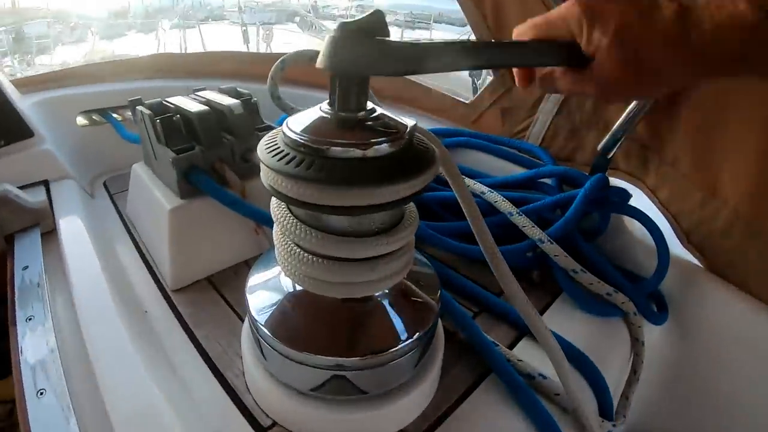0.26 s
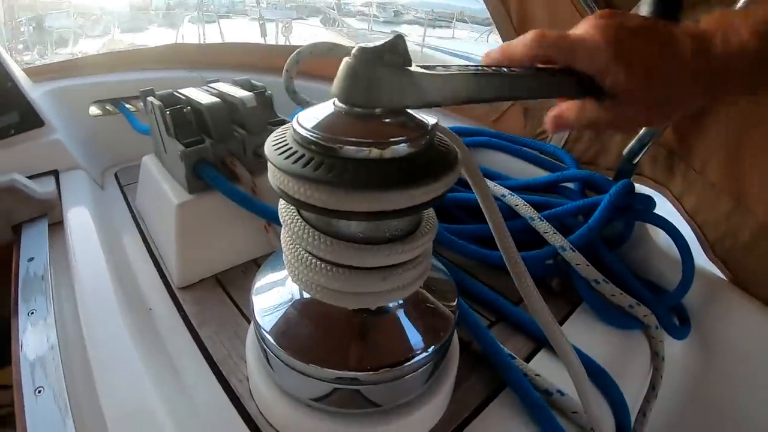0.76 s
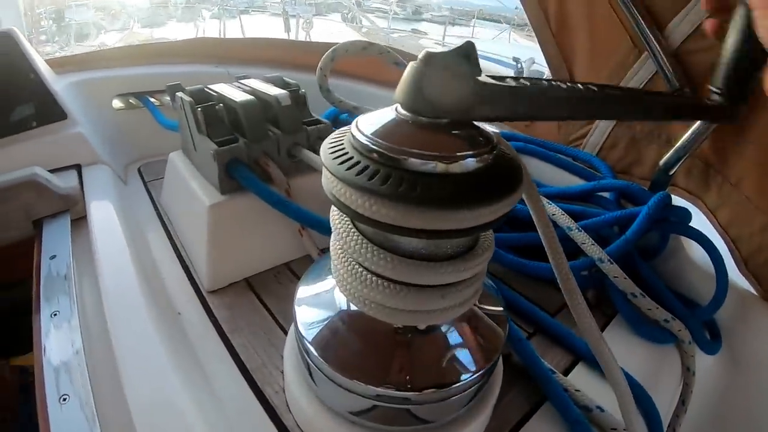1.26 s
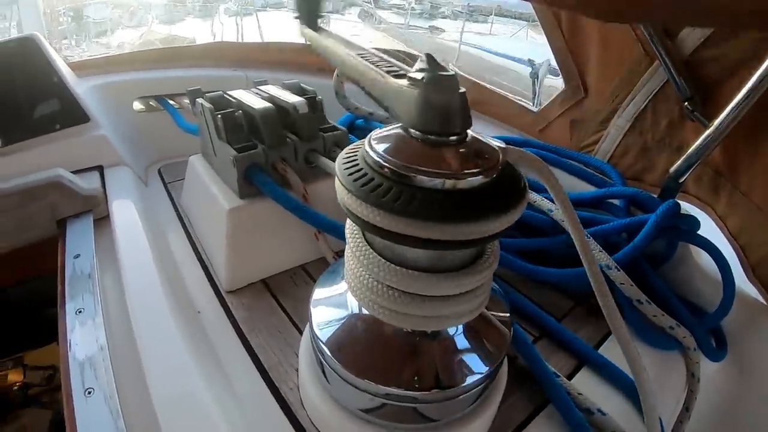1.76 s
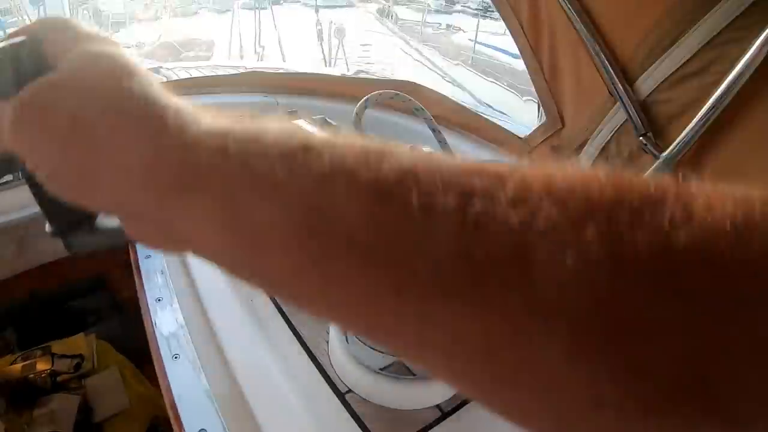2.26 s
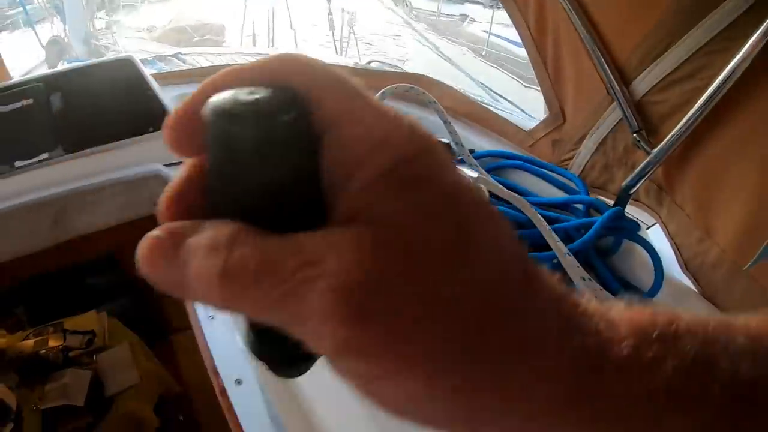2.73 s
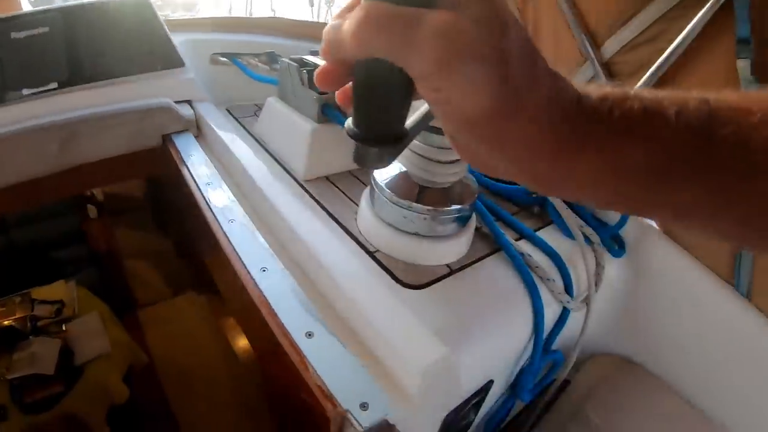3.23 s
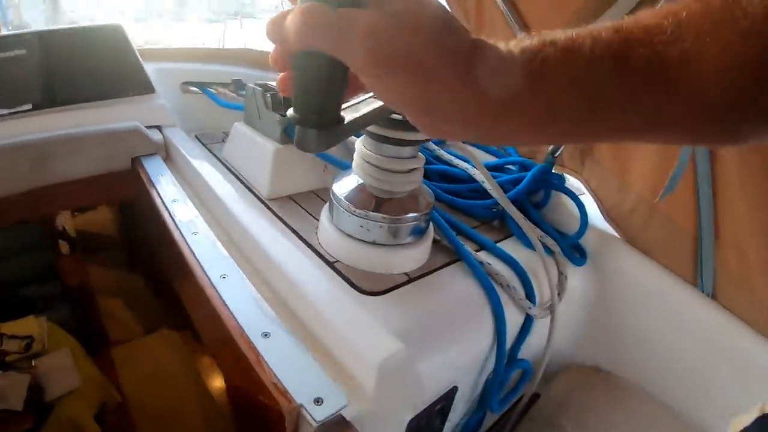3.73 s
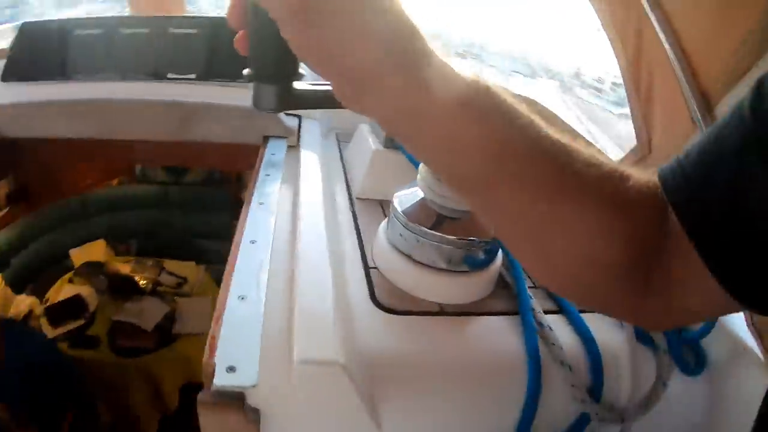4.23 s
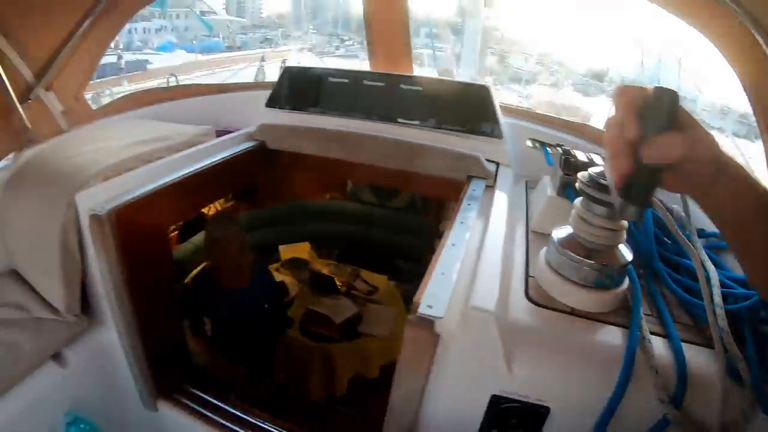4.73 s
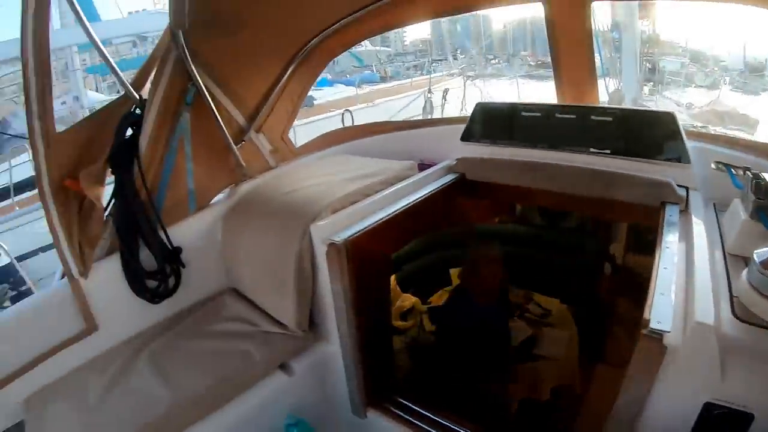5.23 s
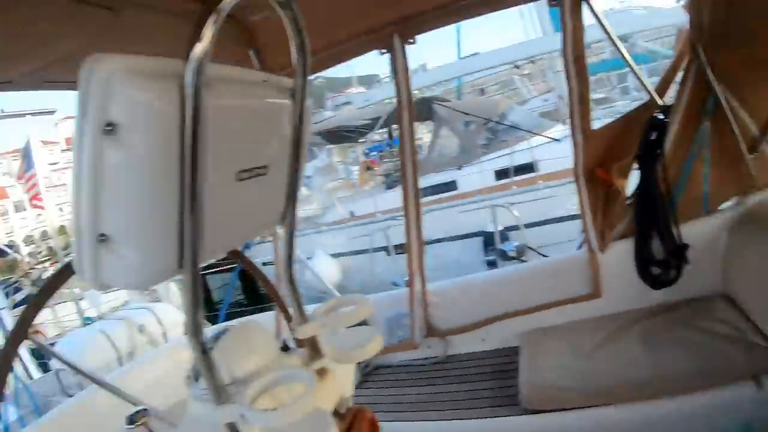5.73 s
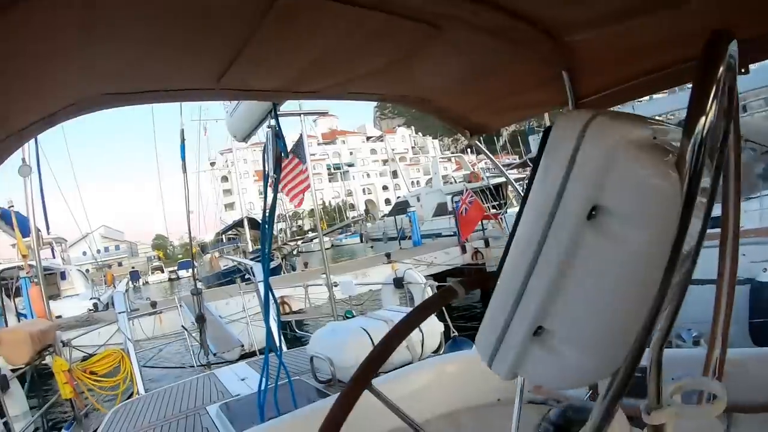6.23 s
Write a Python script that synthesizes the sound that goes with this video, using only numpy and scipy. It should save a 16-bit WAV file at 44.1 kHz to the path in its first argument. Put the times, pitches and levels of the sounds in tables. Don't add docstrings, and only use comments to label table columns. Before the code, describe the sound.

Two solid metallic knocks thump a boat deck, a spring pings, then a winch ratchets in two runs of crisp clacks amid cloth rustle and light wind.

```python
import sys
import numpy as np
from scipy import signal
from scipy.fft import rfft, irfft, next_fast_len
from scipy.io import wavfile
from scipy.ndimage import map_coordinates

SR = 44100
rng = np.random.default_rng(int(sys.argv[2]) if len(sys.argv) > 2 else 0)


def to_wav(sig):
    pcm = np.clip(np.atleast_2d(sig), -1, 1) * 32767
    pcm = np.round(pcm).astype(np.int16)
    wavfile.write(sys.argv[1], SR, pcm.T)


def boost_factor(decibels):
    exponent = np.asarray(decibels, float) / 20
    return 10 ** exponent


N = 285703

# start [s], peak [dB], bright part re peak [dB], ring [Hz].
TOUCHES = [(0.0004, -23.5, -12, 2480), (0.0233, -32.5, -14, 2230), (0.0845, -23.5, -16, 2310),
           (0.1172, -8.5, -24, 2330), (0.1361, -26.5, -19, 2280), (0.2308, -31.5, -17, 2070),
           (0.2842, -56, -15, 1510), (0.3171, -47.5, -22.5, 1210), (0.453, -36.5, -8.5, 2400),
           (0.4725, 2.5, -11.5, 2490), (0.6357, -43.5, -36.5, 2045), (0.7104, -37, -20.5, 1350),
           (0.716, -34, -22.5, 3540), (0.7589, -39.5, -25, 4520), (0.804, -40.5, -25, 1240),
           (0.86, -51, -3, 1560), (0.9059, -26, -4.5, 1790), (0.9248, -23, -2.5, 4440),
           (1.249, -36, -20, 4670), (2.567, -43, -20, 1200), (2.7324, -44, -25, 1660),
           (3.5418, -51, -19, 1746), (3.882, -53, -20, 1240), (4.142, -43, -18, 1260),
           (4.327, -44.5, -6, 2100), (4.434, -47, -30, 1200)]
# frequency [Hz], density [dB per Hz].
KNOCK_SPECTRUM = [(700, -24.5), (1300, -12), (2000, -4.5), (2450, 0.5), (2900, -7.5), (3500, -2.5),
                  (4500, -5), (5500, -30.5)]
# frequency [Hz], density [dB per Hz].
CRACK_SPECTRUM = [(3500, -20), (4500, -3), (5400, 2), (8000, -3), (12000, -15), (16500, -21.5)]
# frequency [Hz], density [dB per Hz].
THUD_SPECTRUM = [(80, -25), (140, -0.5), (190, 5), (300, -13.5), (600, -12), (1000, -18), (1600, -32)]
# frequency [Hz], level [dB], T60 [s].
DECK_MODES = [(195, 2.5, 0.085), (151, -9, .13), (302, -10.5, 0.15)]
# start [s], level [dB].
SEATED = [
    (0.1178, -7),
    (0.4735, -1.3),
]
# frequency [Hz], level [dB], T60 [s].
SOCKET_MODES = [(2442, 1.5, .03), (2180, -10.5, .06), (2550, -14, 0.1), (3540, -8, 0.03), (3850, -21, .08),
                (5330, -22, 0.072), (7780, -27, 0.03)]
# start [s], frequency [Hz], level [dB], T60 [s].
LATCH_RINGS = [
    (0.907, 6560, -37, 0.06),
    (0.928, 4450, -35, 0.085),
    (0.926, 11000, -35, 0.07),
    (0.927, 11350, -37, 0.11),
    (0.926, 14800, -41, .06),
    (.761, 4520, -49, .08),
]
# start [s], level [dB], T60 [s].
BUMPS = [
    (1.281, -28.5, 0.08),
    (0.905, -34, 0.035),
    (0.926, -37, .05),
    (2.74, -48, 0.057),
    (.745, -45, .03),
    (3.8, -43, .07),
    (.805, -46, .03),
]
# frequency [Hz], density [dB per Hz].
BUMP_SPECTRUM = [(120, -8.5), (250, -4.5), (550, 0.5), (1000, -1), (1500, -7), (2200, -11.5), (4000, -24.5),
                 (8000, -46)]

# time [s], level [dB].
STIR = [(0, -46.5), (.14, -48), (.2, -56.5), (.52, -61), (.9, -60.5), (1.24, -56.5), (1.6, -53.5),
        (2.01, -54), (2.42, -57), (2.65, -53), (3.03, -59), (3.34, -66), (3.7, -58), (3.81, -50.5),
        (4.28, -53), (4.56, -61), (5.14, -55.5), (6.48, -57.5)]
# frequency [Hz], density [dB per Hz].
RUSTLE_SPECTRUM = [(150, -18), (300, 5), (700, -1), (1500, -6.5), (3000, -13.5), (4500, -29)]
# frequency [Hz], density [dB per Hz].
SWISH_SPECTRUM = [(1800, -26), (3500, 5), (6500, -1), (9000, -8), (13000, -9), (16200, -10.5)]
# centre [Hz], width [Hz], level [dB].
HUM_BANDS = [(50, 14, -46), (79.6, 22, -49.5), (113.2, 24, -51), (177, 40, -63), (293.2, 18, -62)]
# time [s], level [dB].
DRONE = [
    (0.0, -45.5),
    (1.95, -46.5),
    (3.59, -51),
    (5.4, -47),
    (6.48, -50.5),
]
# frequency [Hz], density [dB per Hz].
FLOOR_SPECTRUM = [(40, -7), (200, -6), (400, -19), (800, -25), (2000, -30), (5000, -34), (10000, -42.5),
                  (15500, -44), (16300, -53.5)]
# frequency [Hz], density [dB per Hz].
WIND_SPECTRUM = [(5, -11.5), (12, -2), (35, -8), (55, -17.5), (120, -31.5), (300, -48)]
# centre [s], rise [dB], width [s].
GUSTS = [
    (0.77, 8.5, .09),
    (1.8, 3.5, .15),
    (2.45, 4.5, .15),
    (2.9, 5, .12),
    (3.3, 5, .12),
    (3.65, 7, .15),
    (4.35, 4.5, 0.21),
    (5.5, 8.5, 0.16),
    (6.05, 5, .3),
]

# start [s], length [s], centre [Hz], width [Hz], level [dB].
RUBS = [(0.056, 0.046, 2330, 250, -34), (0.427, 0.03, 2450, 200, -57), (0.973, .17, 1490, 300, -64),
        (1.14, 0.14, 1480, 200, -59), (1.04, 0.25, 5400, 1200, -68), (1.193, 0.09, 2850, 300, -61),
        (1.33, 0.14, 3010, 200, -61), (1.327, .1, 2400, 200, -63), (1.482, .1, 1270, 120, -57.5),
        (3.38, 0.16, 806, 50, -67), (3.863, 0.058, 990, 500, -52), (4.05, 0.27, 2400, 1200, -57),
        (1.19, .08, 280, 80, -44), (1.26, .09, 200, 50, -43), (1.27, .06, 520, 200, -50),
        (4.82, .1, 2350, 700, -60.5)]

# start [s], clack [dB], low and high drum ring re clack [dB].
FIRST_TURN = [(1.373, -30.0, -18.5, -25.5), (1.472, -26, -5.5, -17), (1.569, -27, -16.0, -34.5),
              (1.646, -24.5, -8.5, -14.5), (1.715, -22, -21.5, -30), (1.778, -25, -29.0, -38.5),
              (1.847, -25.0, -25, -27.0), (1.922, -24.5, -18.5, -28), (1.995, -27.5, -26.0, -33.0),
              (2.072, -23, -19.0, -34.0), (2.162, -22.0, -18.5, -31), (2.3, -27.5, -2.5, -17.5),
              (2.436, -24.5, -18, -17), (2.592, -31.5, -15.0, -25)]
# start [s], clack [dB], low and high drum ring re clack [dB].
SECOND_TURN = [(4.357, -32, -15.5, -20), (4.557, -29.0, -26, -31.0), (4.754, -29.5, -18.5, -25.0),
               (4.936, -30, -20.5, -35.5), (5.062, -30, -42.5, -41.0), (5.134, -29.5, -22, -24),
               (5.194, -30, -19.5, -45.0), (5.268, -32.5, -17.5, -16), (5.375, -29.5, -11, -14.5),
               (5.453, -31.0, -4, -14), (5.535, -30.5, -18, -28.5), (5.624, -34.5, -20, -26.0),
               (5.713, -36.0, -14, -13), (5.791, -33.5, -8, -9.5), (5.857, -32.5, -6, -9.0),
               (5.918, -29.5, -34.5, -31.5), (5.984, -34.0, -45.0, -36.0), (6.062, -34, -9.5, -19),
               (6.147, -34.0, -9, -10), (6.216, -35.5, 6, -14), (6.295, -33.0, -14, -20),
               (6.367, -31.0, -19, -27.0), (6.445, -29.5, -23.5, -21)]
# frequency [Hz], density [dB per Hz].
CLACK_SPECTRUM = [(210, -52), (350, -5), (806, -4.5), (1130, -3), (2120, -1), (2800, -7), (3580, -8),
                  (4570, -15), (5000, -7.5), (6500, -18.5), (11000, -120)]
# frequency [Hz], density [dB per Hz].
SNAP_SPECTRUM = [(3000, -23), (4500, 4), (6500, 3), (9000, -3.5), (12000, -4), (13500, -26)]
# frequency [Hz], density [dB per Hz].
EDGE_SPECTRUM = [(11500, -28), (13000, 0), (15500, 4), (16800, -8.5)]
# frequency [Hz], level [dB], T60 [s].
BASE_MODES = [(926.4, -12.5, 0.049), (1217, -1.5, 0.07), (1550, -8, 0.04), (2140, -3, 0.04),
              (2635, -6.5, 0.058)]
# frequency [Hz], level [dB], T60 [s].
LOW_DRUM_MODES = [(5314, -3, 0.11), (5550, -6.5, 0.073), (5290, -3, 0.078), (4950, -10, 0.047),
                  (5780, -9, 0.027)]
# frequency [Hz], level [dB], T60 [s].
HIGH_DRUM_MODES = [(12110, -6, .13), (12010, 5.5, 0.056)]

# start [s], length [s], level [dB].
STROKES = [
    (2.774, 0.067, -60),
    (3.032, 0.2, -48.5),
    (3.291, 0.068, -57),
    (3.556, 0.032, -58.5),
    (3.645, 0.063, -52.5),
    (3.769, 0.074, -60.5),
    (4.136, 0.08, -60),
]
# frequency [Hz], density [dB per Hz].
SLIDE_SPECTRUM = [(700, -9), (1300, 3), (3000, -1), (6500, -3.5), (9000, -8.5), (13000, -17),
                  (16200, -13.5)]

# frequency [Hz], left minus right [dB].
PORT_LEVEL = [(60, -14.5), (110, -24.5), (200, -13), (380, -11.5), (700, -7.5), (1290, -1.5), (2380, -0.5),
              (4400, 2.0), (8120, 4.5), (15000, 1)]
# frequency [Hz], lead of left [rad].
PORT_LEAD = [(20, 0), (300, 1.3), (1400, 1), (2300, .5), (4300, -2.2), (5500, -1.6), (7000, .4),
             (11000, -1.2), (16000, -1.2)]

TOUCH_T60_S = .05
TICK_DB, TICK_MAX_DB = -5.5, -38
THUMP_DB, LEAN_DB = -16.5, -57
RUSTLE_DB, RUSTLE_DB_PER_DB = -56, 1.02
SWISH_DB, SWISH_DB_PER_DB = -71, 1.5
BREEZE_DB, DRIFT_DB = -47.5, .8
TURNED_AWAY_S = 3.5
SNAP_FACING_DB, SNAP_AWAY_DB = -33.5, -42.3
EDGE_DB, EDGE_SCATTER_DB = -8, 1.5


def unit(x):
    return x / np.sqrt(np.mean(x ** 2) + 1e-20)


def along(points, hz):
    f, v = np.transpose(points)
    return np.interp(np.log(hz + 1), np.log(f + 1), v)


def filtered(x, response):
    size = x.shape[-1]
    padded = next_fast_len(size + 1024)
    spectrum = rfft(x, padded) * response(np.fft.rfftfreq(padded, 1 / SR))
    return irfft(spectrum, padded)[..., :size]


def pair(size, apart):
    common, own = rng.standard_normal((2, size))
    return np.array([common + apart * own, common - apart * own]) / np.hypot(1, apart)


def wobble(rate_hz, size):
    knots = rng.standard_normal(int(size * rate_hz / SR) + 4)
    return map_coordinates(knots, [np.arange(size) * rate_hz / SR])


def noise(spectrum, size, apart):
    def shape(hz):
        inside = (hz > spectrum[0][0] / 2) * (hz < spectrum[-1][0] * 2)
        return boost_factor(along(spectrum, hz)) * inside
    return unit(filtered(pair(size, apart), shape))


def burst(spectrum, t, rise, t60, tail_db, tail_t60, lumps_db, apart):
    decay_db = -60 * (t / t60) ** 1.17
    cluster = boost_factor(decay_db + lumps_db * wobble(400, len(t))) * noise(spectrum, len(t), apart)
    tail = boost_factor(tail_db - 60 * t / tail_t60) * noise(spectrum, len(t), apart=.8)
    return (cluster + tail) * (1 - np.exp(-t / rise))


def ring(modes, t, rise, scatter_db, rough_db):
    out = 0
    for hz, db, t60 in modes:
        level = boost_factor(db + rng.normal(0, scatter_db) + rng.normal(0, 1.5, (2, 1)))
        phase = np.exp(1j * (rng.uniform(0, 2 * np.pi) + rng.normal(0, 0.51, (2, 1))))
        detuned_hz = hz * rng.normal(1, 0.0041)
        mode = np.exp((2j * np.pi * detuned_hz - np.log(1000) / t60) * t)
        out = out + (level * phase * mode).imag
    return out * boost_factor(rough_db * wobble(250, len(t))) * (1 - np.exp(-t / rise))


def add(track, s, sound):
    track[:, round(s * SR):][:, :sound.shape[1]] += sound


def handle():
    out, t = np.zeros((2, N + SR)), np.arange(SR // 6) / SR
    t60 = TOUCH_T60_S
    for s, db, bright_db, hz in TOUCHES:
        knock = boost_factor(-9) * burst(KNOCK_SPECTRUM, t, rise=.0008, t60=0.65 * t60, tail_db=-14, tail_t60=0.16,
                                lumps_db=3.5, apart=0.53)
        bar_modes = [(hz, 0, 1.2 * t60), (hz * 1.4, -3, 0.27 * t60)]
        bar = boost_factor(-14) * ring(bar_modes, t, rise=0.0017, scatter_db=3.0, rough_db=4.5)
        crack = boost_factor(bright_db - 2.0) * burst(CRACK_SPECTRUM, t, rise=0.00071, t60=.6 * t60, tail_db=-18.5,
                                             tail_t60=.17, lumps_db=-2.0, apart=.55)
        thud = boost_factor(-2.0) * burst(THUD_SPECTRUM, t, rise=0.0055, t60=.12, tail_db=-24, tail_t60=0.25,
                                 lumps_db=3, apart=0.28)
        thud = thud + ring(DECK_MODES, t, rise=0.00602, scatter_db=0.0, rough_db=0.1)
        tick = burst(CLACK_SPECTRUM, t, rise=.0008, t60=.03, tail_db=-12.5, tail_t60=.12, lumps_db=3, apart=.45)
        add(out, s, boost_factor(min(db, TICK_MAX_DB) + TICK_DB) * tick)
        add(out, s, boost_factor(db) * (knock + bar + crack))
        add(out, s, (boost_factor(db + THUMP_DB) + boost_factor(LEAN_DB)) * thud)
    for s, db in SEATED:
        add(out, s, boost_factor(db) * ring(SOCKET_MODES, t, rise=0.0004, scatter_db=0.2, rough_db=1.5))
    for s, hz, db, t60 in LATCH_RINGS:
        add(out, s, ring([(hz, db, t60)], t, rise=0.0014, scatter_db=1.0, rough_db=7.0))
    for s, db, t60 in BUMPS:
        bump = burst(BUMP_SPECTRUM, t, rise=0.0028, t60=t60, tail_db=-6, tail_t60=0.2, lumps_db=4.0, apart=0.9)
        add(out, s, boost_factor(db) * bump)
    return out[:, :N]


def air():
    t = np.arange(N) / SR
    stir_db = np.interp(t, *np.transpose(STIR))
    stir_db = stir_db - stir_db.mean()
    grain = wobble(300, N)
    rustle_db = RUSTLE_DB + RUSTLE_DB_PER_DB * stir_db + 2.2 * wobble(45, N) + 2.5 * grain
    rustle = boost_factor(rustle_db) * noise(RUSTLE_SPECTRUM, N, apart=0.37)
    swish_db = SWISH_DB + SWISH_DB_PER_DB * stir_db + 1.5 * wobble(30, N) + 1.3 * grain
    swish = boost_factor(swish_db) * noise(SWISH_SPECTRUM, N, apart=0.66)

    def bands(f):
        return sum(boost_factor(db) / np.sqrt(width) / (1 + ((f - hz) / width * 2) ** 2) for hz, width, db in HUM_BANDS)
    hum_db = np.interp(t, *np.transpose(DRONE)) + 3.5
    hum = boost_factor(hum_db) * unit(filtered(pair(N, .6), bands))
    floor = boost_factor(-53.5) * noise(FLOOR_SPECTRUM, N, apart=1.0)
    return rustle + swish + hum + floor


def wind():
    t = np.arange(N) / SR
    lumps = boost_factor(2.5 * np.array([wobble(8.4, N), wobble(16, N)]))
    gusts_db = sum(db * np.exp(-((t - s) / width) ** 2) for s, db, width in GUSTS)
    level = boost_factor(BREEZE_DB + gusts_db + DRIFT_DB * wobble(3, N))
    buffeting = unit(lumps * noise(WIND_SPECTRUM, N, apart=1.0))
    return level * buffeting * boost_factor([[-1.5], [1.5]])


def rubs():
    out = np.zeros((2, N + SR))
    for s, length, hz, width, db in RUBS:
        size = round(length * SR)
        band = filtered(pair(size, 0.41), lambda f: 1 / (1 + ((f - hz) / width * 2) ** 2))
        stroke = np.sin(np.linspace(0, np.pi, size)) ** 0.35
        add(out, s, boost_factor(db + 2.2 * wobble(120, size)) * stroke * unit(band))
    return out[:, :N]


def pawls():
    out, t = np.zeros((2, N + SR)), np.arange(SR // 7) / SR
    for s, db, low_db, high_db in FIRST_TURN + SECOND_TURN:
        slow, wet_db, snap_db = .95, -.5, SNAP_FACING_DB
        if s > TURNED_AWAY_S:
            slow, wet_db, snap_db = 1.3, 3, SNAP_AWAY_DB
        edge_db = snap_db + EDGE_DB + rng.normal(0, EDGE_SCATTER_DB)
        clack = boost_factor(db - 6) * burst(CLACK_SPECTRUM, t / slow, rise=0.00209, t60=0.067, tail_db=wet_db - 8.0,
                                    tail_t60=0.17, lumps_db=2.5, apart=0.47)
        base = boost_factor(db - 9.5) * ring(BASE_MODES, t, rise=0.0026, scatter_db=3.5, rough_db=2.1)
        snap = boost_factor(snap_db) * burst(SNAP_SPECTRUM, t / slow, rise=0.0011, t60=.04, tail_db=wet_db - 10.6,
                                    tail_t60=0.15, lumps_db=2.5, apart=0.8)
        edge = boost_factor(edge_db) * burst(EDGE_SPECTRUM, t / slow, rise=.0006, t60=.035, tail_db=wet_db - 13,
                                    tail_t60=0.135, lumps_db=1.5, apart=0.71)
        low = boost_factor(db + low_db + 7) * ring(LOW_DRUM_MODES, t, rise=0.0031, scatter_db=2.0, rough_db=5.5)
        high = boost_factor(db + high_db + 7) * ring(HIGH_DRUM_MODES, t, rise=0.0046, scatter_db=0.5, rough_db=3.5)
        add(out, s - .0013 * slow, clack + base + snap + edge + low + high)
    return out[:, :N]


def cloth():
    t = np.arange(N) / SR
    shape = 0
    for s, length, db in STROKES:
        shape = shape + boost_factor(db) * np.sin(np.pi * np.clip((t - s) / length, 0, 1)) ** 0.588
    grain_db = 1.2 * wobble(80, N) + 1.27 * wobble(500, N)
    return shape * boost_factor(grain_db) * noise(SLIDE_SPECTRUM, N, apart=0.51)


def ports(x):
    def response(hz):
        ratio = boost_factor(along(PORT_LEVEL, hz))
        turn = np.exp(.5j * along(PORT_LEAD, hz))
        return 2 * np.array([ratio * turn, 1 / turn]) / (1 + ratio)
    return filtered(x, response)


def scene():
    airborne = pawls() + handle() + rubs() + cloth() + air()
    return ports(airborne) + wind()


def top_cut(x):
    return signal.sosfilt(signal.butter(12, 16810, fs=SR, output="sos"), x)


def record(dry):
    soft = dry / (1 + np.abs(dry / 1.6) ** 6) ** (1 / 6)
    limited = filtered(soft, lambda hz: hz < 16800)
    return top_cut(limited)


dry = scene()
out = record(dry)
to_wav(out)
```